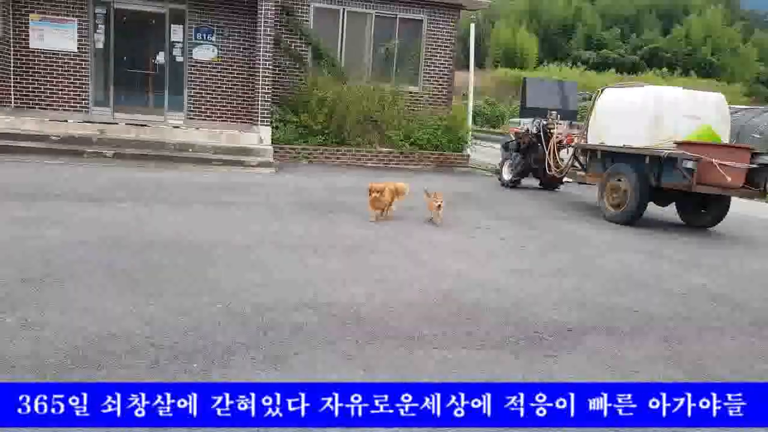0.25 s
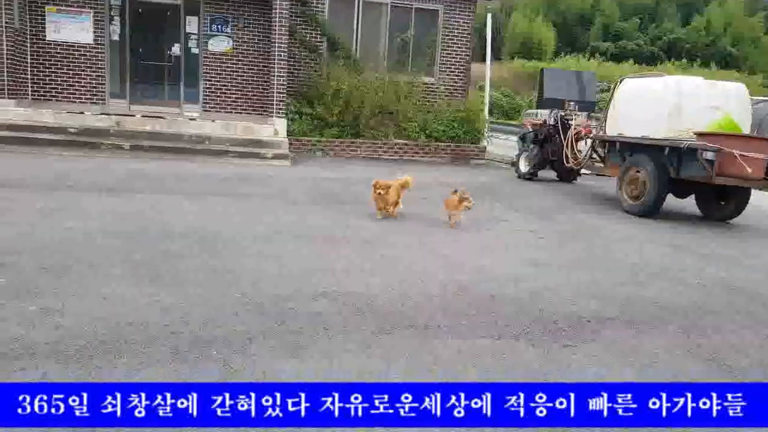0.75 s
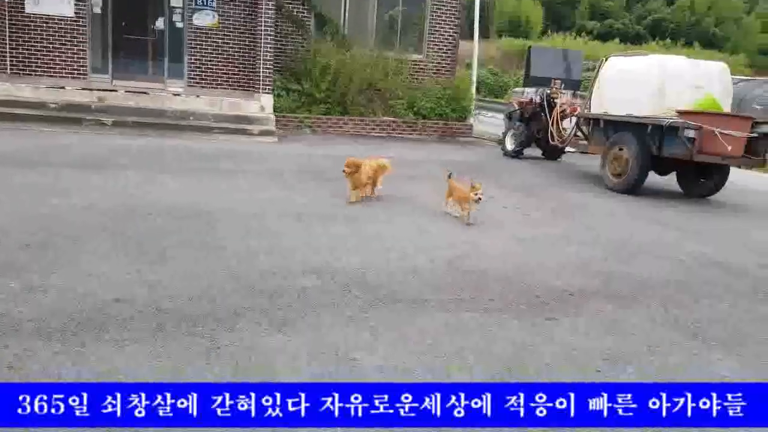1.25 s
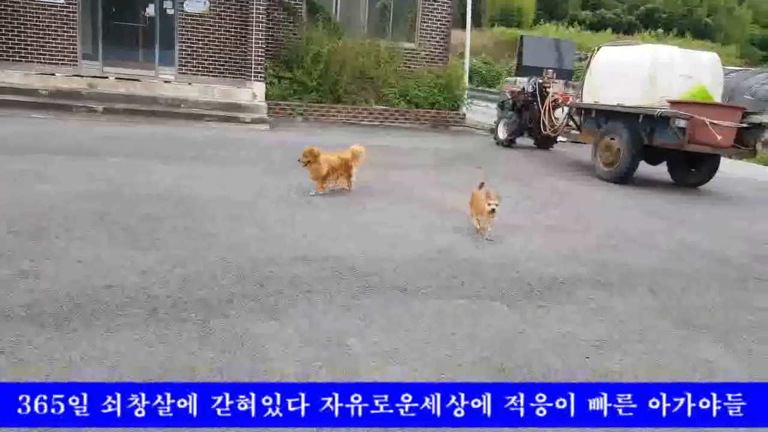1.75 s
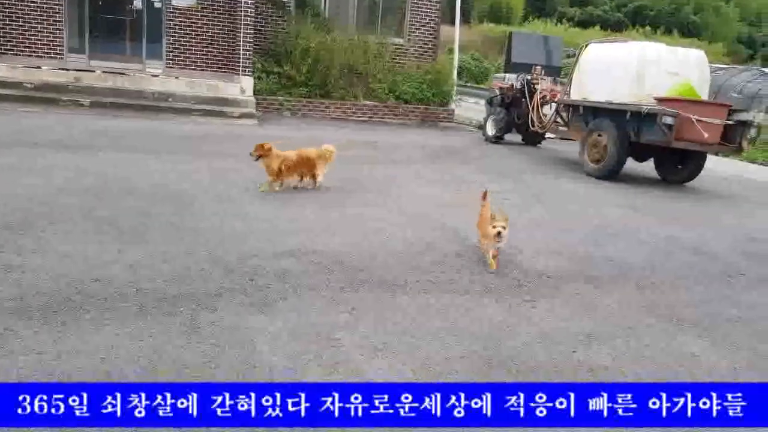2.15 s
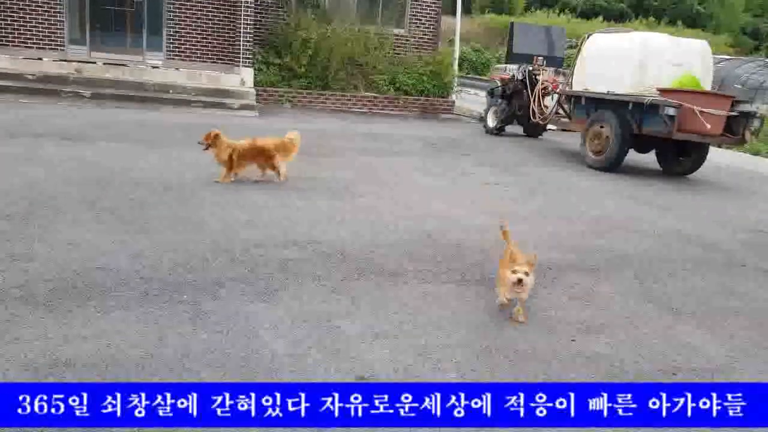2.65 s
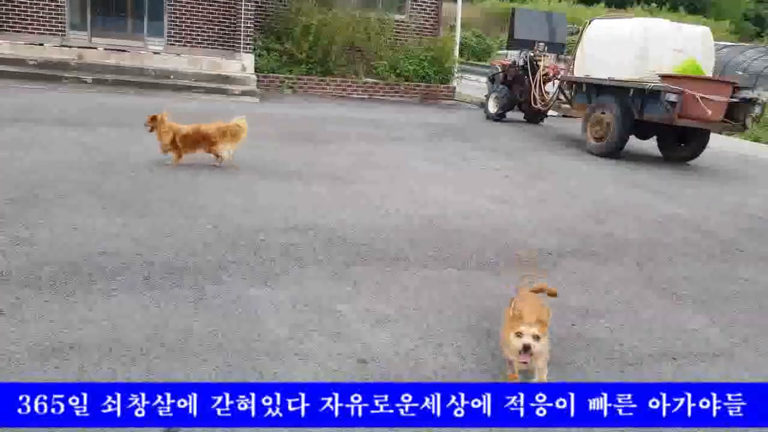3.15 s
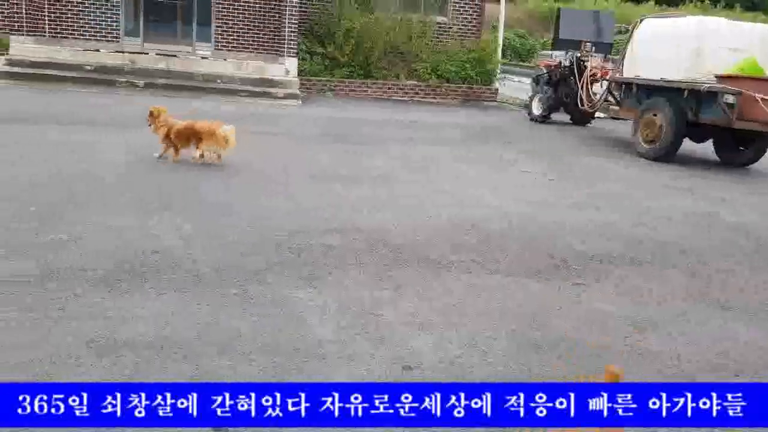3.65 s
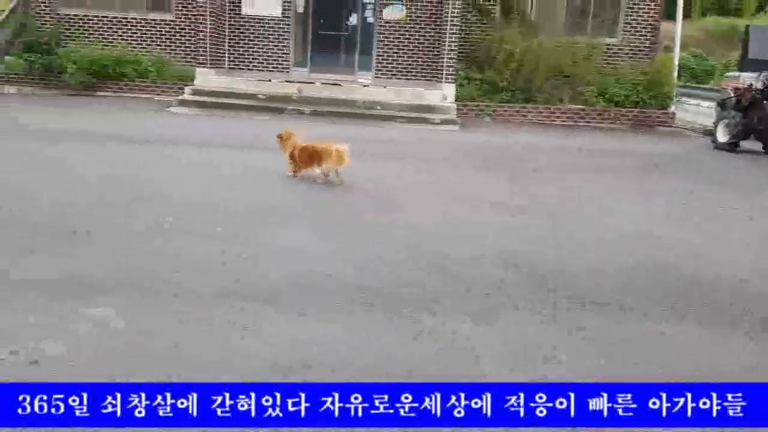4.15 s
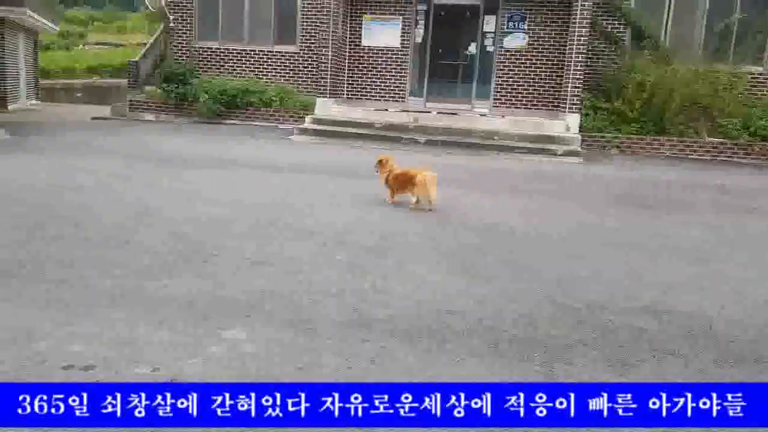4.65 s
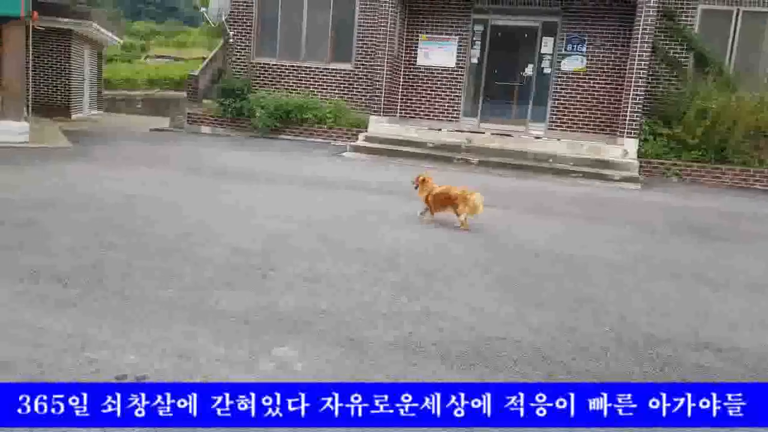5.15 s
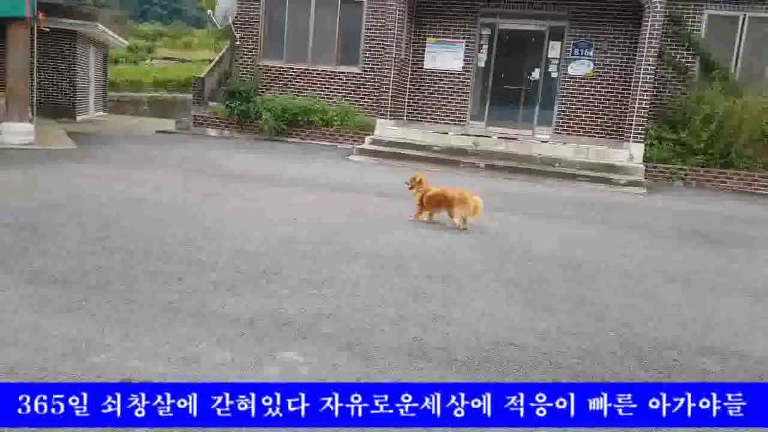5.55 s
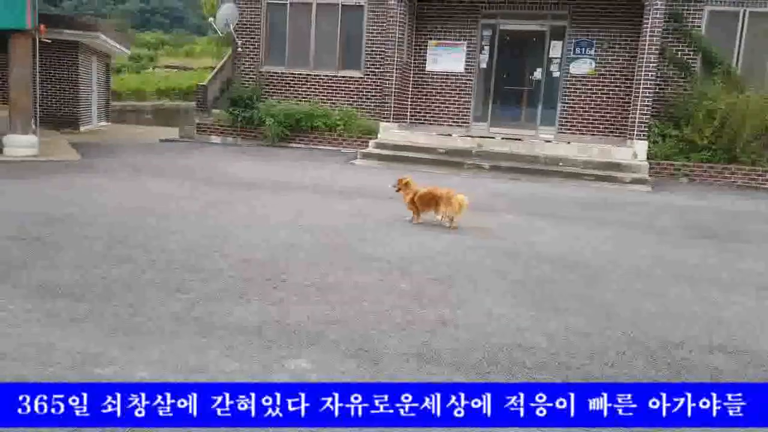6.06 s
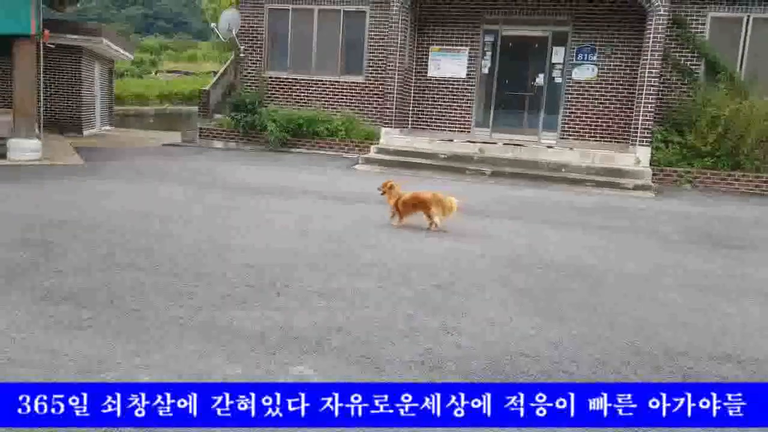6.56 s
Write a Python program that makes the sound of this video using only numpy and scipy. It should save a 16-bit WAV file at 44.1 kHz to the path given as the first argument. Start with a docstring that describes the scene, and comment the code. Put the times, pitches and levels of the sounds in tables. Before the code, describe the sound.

Open farmyard in late summer, stereo and distant. Field crickets chirr steadily, mostly to the left, over low traffic rumble and faint motor hum. A far bird chips about once a second. From under two seconds a small dog's claws tick on asphalt, growing clearer, then fast breathy pants join and last until about five and a half seconds. A short insect trill comes midway; a low breeze and tiny soft clicks end it.

```python
"""A small dog: its claws tick as decaying noise bursts, its pants are puffs of resonant noise, then soft clicks.
Around it lies a quiet farmyard in late summer. Field crickets are short gliding tones, singly and massed;
a trill is a beaten tone; bush crickets are pulsed noise; far insects are fluttering bands of noise.
Birds chip and whistle in gliding tones and call hoarsely in noise.
Beneath lie a low rumble of filtered noise, a breeze and a far motor's hum of wavering tones."""
import sys
import numpy as np
from scipy import signal
from scipy.fft import rfft, irfft
from scipy.io import wavfile
from scipy.ndimage import uniform_filter1d

SR = 44100
rng = np.random.default_rng(int(sys.argv[2]) if len(sys.argv) > 2 else 0)


def inscribe(sig):
    """Save sig as 16-bit PCM at rate SR to the path in sys.argv[1].

    A 1-D sig is mono; a 2-D sig holds one channel per row.
    Samples are clipped to [-1, 1] before scaling.
    """
    pcm = np.round(np.clip(np.atleast_2d(sig).T, -1, 1) * 32767)
    wavfile.write(sys.argv[1], SR, pcm.astype(np.int16))


N = 300762
T = np.arange(N) / SR  # time of each sample, s
HZ = np.fft.rfftfreq(N, 1 / SR)  # frequency of each spectral line, Hz
EDGE_HZ = 15780  # upper limit of the whole sound

# Spectra are relative levels per Hz; their overall level is set elsewhere.
# spectrum of the low rumble: [f/Hz, level/dB]
RUMBLE_SPECTRUM = [(12, -20), (25, -19), (35, -10), (46, 0.4), (70, 0.6), (105, -1), (145, -8.5),
                   (240, -10.5), (330, -16), (480, -20.5), (640, -21.5), (745, -29), (920, -40),
                   (1400, -60)]
# course of the rumble before a fixed gain: [t/s, level/dB]
RUMBLE_COURSE = [(0, -54), (.7, -56.5), (1.8, -54.5), (2.25, -54.5), (2.7, -55.5), (4.2, -54), (5.2, -55),
                 (6.82, -54)]
# likeness of the rumble at the two ears: [f/Hz, likeness 0-1]
RUMBLE_LIKENESS = [(50, 0.94), (150, 0.98), (350, 0.81), (700, 0.32), (1200, 0.12)]
# a breath of wind: [t/s, level/dB]
BREEZE_COURSE = [(0, -59.5), (5.9, -69), (6.15, -53), (6.35, -56), (6.55, -48), (6.82, -58)]
# tones of the far motor: [f/Hz, level/dB, rms waver/Hz]
MOTOR_TONES = [(59.77, -52.5, 0.75), (165.5, -69, 2.12), (362, -70.5, 1.986), (372, -75.5, 0.83),
               (456.4, -79, 3.3), (621.5, -80, 7), (675, -87, 1.43)]

# spectrum of the faint hiss: [f/Hz, level/dB]
HISS_SPECTRUM = [(300, -3), (900, 2), (1350, 2.5), (1750, -0.3), (3100, 1.5), (5200, -1), (7200, 4.5),
                 (9700, -5), (14000, 3.5), (15800, -3)]
PATCH_DB = 1.4  # rms depth of the patches in the far insects and hiss
# noise bands: a faint band near 2.2 kHz that leans left, then far insect choruses: [centre f/Hz, width/Hz,
# level/dB, left-right difference/dB, rms flutter/dB]
NOISE_BANDS = [(2230, 600, -79.5, 8.5, 0.6), (4800, 1070, -75.5, -6, 3), (6030, 1340, -72, 1, 1.9),
               (8010, 780, -71, 6.5, -0.2), (8500, 950, -69, 1.5, 1.5), (12400, 2100, -73, -2, 1.5)]

# spectrum of the mass of field crickets: [f/Hz, level/dB]
CRICKET_SPECTRUM = [(3100, -38), (3450, -3), (3750, 4), (4100, 3), (4500, 4.5), (4680, -2), (4850, -15.5)]
# course shared by the mass and the crowd, before their own gains: [t/s, level/dB]
CRICKET_COURSE = [(0, -65), (.5, -62.5), (1.0, -65), (1.9, -61.5), (2.6, -65), (3.7, -64), (4.4, -68),
                  (5.1, -65), (6.15, -67.5), (6.82, -62.5)]
# runs of near wing strokes: [first t/s, strokes, rate/(strokes per s), f/Hz, level of last stroke/dB]
NEAR_RUNS = [(0.0, 3, 14.7, 4100, -57.5), (0.246, 6, 24.5, 4080, -62), (0.563, 2, 23, 4060, -64),
             (.713, 3, 9, 4120, -61), (.77, 3, 8.6, 4070, -64), (1.036, 5, 14, 3630, -64),
             (1.02, 4, 15.5, 3950, -63.5), (1.437, 5, 16, 3630, -64.5), (1.486, 6, 15, 4080, -60.5),
             (1.92, 5, 19.3, 4040, -60), (2.228, 2, 23, 4090, -63), (2.383, 4, 8.6, 4040, -63),
             (2.855, 6, 17, 4010, -63.5), (3.371, 4, 14.8, 4110, -60.5), (3.698, 3, 16.5, 4050, -61.5),
             (3.862, 4, 18.5, 4110, -66), (4.179, 3, 8.3, 4150, -64), (5.107, 4, 13.7, 4090, -67),
             (5.404, 3, 15, 4060, -70), (6.729, 2, 15, 4080, -66)]
SWELL_DB_PER_STROKE = 1.1
# the crowd: number of runs, gain on the shared course, pace, lowest pitch and pitch range
CROWD_COUNT, CROWD_DB = 55, -5
CROWD_PER_S, CROWD_LOW_HZ, CROWD_RANGE_HZ = 14.7, 3820, 676

# the trill: onset, attack, hold from onset, level before the beats, and fade after the hold
TRILL_START_S, TRILL_ATTACK_S, TRILL_HOLD_S = 4.39, 0.075, 0.31
TRILL_DB, TRILL_FADE_DB_PER_S = -62.5, 17
# its first pitch, sag, rms jitter of pitch, and scattered level
TRILL_HZ, TRILL_SAG_HZ_PER_S2 = 4675, 205
TRILL_JITTER_HZ, TRILL_WET_DB = 20, -8
# its wing beats: pace, first depth, and time constant of the blurring
TRILL_BEATS_PER_S, TRILL_BEAT_DEPTH, TRILL_BLUR_S = 54, 0.97, 0.47

# rasps of a bush cricket: [start t/s, length/s, level/dB]
RASP_EVENTS = [(0.163, 0.4, -60), (1.96, 0.37, -60.5), (3.66, 0.38, -62.5), (5.39, 0.39, -64)]
# spectrum of the file's hiss: [f/Hz, level/dB]
RASP_SPECTRUM = [(7000, -15), (8200, 5), (10000, 4), (11400, -3), (12400, 8), (13000, 2), (14200, 6.5),
                 (14800, 3), (16000, 1)]
RASP_ROUNDING = .7  # exponent on the swell; less is fuller
# the wing's ringing: first and last pitch, climb time, width
RASP_FIRST_HZ, RASP_LAST_HZ, RASP_CLIMB_S, RASP_WIDTH_HZ = 7900, 10500, 0.17, 1100
RASP_RING_DB, RASP_HISS_DB = -3.5, -0.5
# the file's teeth: mean rate of clicks, and the share of the rasp they carry
RASP_TEETH_PER_S, RASP_BUZZ = 112, .7
# the very high singer: period, time of one crest, level at t = 0, growth
WHISPER_PERIOD_S, WHISPER_AT_S = .2535, 4.565
WHISPER_DB, WHISPER_DB_PER_S = -69, 0.76
# its bands: [centre f/Hz, width/Hz, relative level/dB]
WHISPER_PARTS = [(12500, 3000, 0), (12900, 420, -2)]
# a far insect's shimmer: [t/s, level/dB]
SHIMMER_COURSE = [(0, -76), (.6, -76), (.9, -72), (3.2, -72), (3.7, -78), (6.82, -91)]

# chips of a far bird, before the gain of each note: [t/s, level/dB]
CHIP_EVENTS = [(.155, -53.5), (1.075, -56), (1.935, -55.5), (2.735, -56.5), (3.712, -54.5), (4.735, -57.5),
               (5.735, -56.5)]
# the two rising notes of a chip: [delay/s, middle f/Hz, rise/Hz, length/s, relative level/dB]
CHIP_PAIR = [(0, 6000, 1495, 0.055, -8.5), (0.062, 4955, 1103, 0.055, -6.5)]
CHIP_ROUGH_HZ, CHIP_BREAKUP_DB = 560, 5  # rms scatter of pitch; bound of the uneven level
# thin whistles: [start t/s, length/s, first f/Hz, middle f/Hz, last f/Hz, level/dB]
WHISTLE_EVENTS = [(3.252, 0.12, 2106, 2120, 2380, -76), (4.804, 0.14, 3390, 3810, 3170, -66.5),
                  (6.332, 0.12, 3510, 3630, 3650, -71), (6.482, .085, 3520, 3560, 3690, -70)]
WHISTLE_GROWTH_DB = 1  # rise over one whistle
# hoarse calls: [middle t/s, length/s, f/Hz, width/Hz, level/dB]
CAW_EVENTS = [(0.465, 0.07, 3300, 900, -69.5), (2.103, 0.19, 2850, 900, -68),
              (5.335, 0.48, 1290, 300, -77.5)]
CAW_FLUTTER_DB = 1.8

# soft clicks, perhaps the dog licking its lips: [t/s, f/Hz, level/dB]
SMACK_EVENTS = [(6.584, 1660, -61), (6.6, 2200, -61), (6.633, 2200, -68), (6.657, 2200, -66.5)]
SMACK_WIDTH_HZ, SMACK_DECAY_S = 1500, 0.0055
# claws ticking on asphalt: [t/s, level/dB]
CLAW_TICKS = [(1.6996, -54), (1.85, -55), (1.9928, -50), (2.1395, -54), (2.142, -54), (2.4216, -53),
              (2.4274, -48), (2.431, -51), (2.5749, -46), (2.5846, -54), (2.5943, -52), (2.5971, -51),
              (2.719, -50), (2.7218, -45), (2.8696, -52), (2.8756, -51), (2.8786, -52), (3.0247, -51),
              (3.0275, -46), (3.188, -51), (3.1936, -48), (3.3532, -44.5), (3.357, -46), (3.5298, -48.5),
              (3.5358, -49), (3.7035, -55), (4.0859, -51), (4.0909, -52), (4.1226, -43), (4.3118, -53)]
# paws scuffing the grit: [t/s, level/dB]
PAW_SCUFFS = [(1.85, -61), (1.993, -57), (2.429, -62), (2.578, -62), (2.599, -61), (2.724, -57),
              (2.876, -58), (3.027, -60), (3.191, -56), (3.356, -60), (3.532, -60), (3.707, -58),
              (4.087, -56.5), (4.311, -62)]
# spectrum of ticks and scuffs: [f/Hz, level/dB]
CLAW_SPECTRUM = [(2000, -19), (6000, -10), (8000, -0.5), (9500, 1), (11000, 0), (13000, -1), (16000, -12)]
TICK_DECAY_S, SCUFF_S = 0.0013, 0.015
# pants: [middle t/s, length/s, mouth level/dB, mouth f/Hz, open throat level/dB, low throat level/dB]
PANT_EVENTS = [(2.622, 0.036, -67, 2200, -77, -87), (2.798, 0.06, -67, 1860, -65, -88),
               (3.194, 0.074, -75, 1300, -66, -85), (3.366, 0.059, -66, 2360, -65.5, -78),
               (3.542, 0.066, -66.5, 2260, -63.5, -69), (3.717, 0.071, -69.5, 2040, -68.5, -65),
               (3.899, 0.067, -81, 2350, -64, -61.5), (4.104, 0.059, -68.5, 2140, -59.5, -54.5),
               (4.311, 0.079, -69, 2120, -62.5, -63), (4.52, 0.087, -68.5, 2220, -65.5, -62.5),
               (4.72, 0.077, -75, 2200, -68, -63.5), (4.911, 0.08, -66.5, 2380, -59.5, -62),
               (5.111, 0.063, -73, 1780, -67.5, -63), (5.302, 0.12, -70, 2350, -65, -71),
               (5.5, .06, -71, 2770, -71, -69)]
# resonances of the open throat: [f/Hz, width/Hz, relative level/dB]
THROAT_RESONANCES = [(1040, 130, -3), (1590, 240, -6.5), (2740, 710, -11), (3970, 1140, -4)]
LOW_THROAT_HZ, LOW_THROAT_WIDTH_HZ = 749, 148
MOUTH_WIDTH_HZ = 390


def amp(db):
    """Logarithmic level: decibels become an amplitude ratio."""
    return 10 ** (np.asarray(db) / 20)


def evened(x):
    """Normalisation: the signal is scaled to an rms of one."""
    return x / np.sqrt(np.mean(x ** 2) + 1e-20)


def read(points):
    """Interpolation on logarithmic frequency: a few points become a full spectrum."""
    f, value = np.transpose(points)
    return np.interp(np.log(HZ + 1), np.log(f), value)


def curve(rows):
    """Linear interpolation in time: a few points become a value at every sample."""
    return np.interp(T, *np.transpose(rows))


def band(hz, width):
    """Gaussian band-pass: the response falls smoothly on both sides of its centre."""
    return np.exp(-2 * ((HZ - hz) / width) ** 2)


def drift(rate):
    """Low-passed chance: white noise below about the given rate makes a slow walk of unit rms."""
    return evened(irfft(rfft(rng.standard_normal(N)) * np.exp(-(HZ / rate) ** 2), N))


def pan(db):
    """Interaural level difference: positive values favour the left channel."""
    return amp([[db / 2], [-db / 2]])


def noise(shape, same=0):
    """Partial coherence: two filtered noises share a given part of their spectrum."""
    a, b = rfft(rng.standard_normal((2, N)))
    same = np.clip(same, -1, 1)
    right = same * a + np.sqrt(1 - same ** 2) * b
    return evened(irfft(np.array([a, right]) * shape, N))


def swell(middle, length):
    """Half-cosine envelope: a smooth rise and fall about its middle."""
    return np.cos(np.pi * np.clip((T - middle) / length, -.5, .5))


def yard(x, wet_db, t60):
    """Reverberation: sparse decaying echoes of walls and ground, independent at each ear."""
    t = np.arange(SR // 2) / SR
    echoes = rng.standard_normal((2, len(t))) * (rng.random((2, len(t))) < .05)
    taps = echoes * amp(-60 * t / t60)
    taps *= amp(wet_db) / np.linalg.norm(taps, axis=1, keepdims=True)
    taps[:, 0] += 1  # direct sound
    wet = signal.fftconvolve(np.atleast_2d(x), taps, axes=1)[:, :N]
    return wet / np.sqrt(1 + amp(wet_db) ** 2)


def rumble():
    """Low-frequency coherence: far traffic is alike at both ears at the bottom; a light breeze joins it."""
    tilt = read([(60, 0.71), (300, 1.8), (450, 3.3), (650, 4.3)])  # left-right difference, dB
    side = amp(np.array([[.5], [-.5]]) * tilt)
    traffic = noise(amp(read(RUMBLE_SPECTRUM)) * side, read(RUMBLE_LIKENESS))
    traffic = traffic * amp(curve(RUMBLE_COURSE) + 3)
    breeze = noise(band(60.6, 29), same=0.98) * amp(curve(BREEZE_COURSE)) * pan(0.73)
    return traffic + breeze


def motor():
    """Additive synthesis: a deep hum and weak overtones waver in level and frequency."""
    tones = 0
    for hz, db, waver in MOTOR_TONES:
        level = amp(db + 1.66 * drift(3.8))
        turns = np.cumsum(hz + waver * drift(5.3)) / SR
        tones = tones + level * np.sin(2 * np.pi * turns)
    return np.sqrt(2) * tones * pan(1.5)


def patchy(x, depth_db):
    """Time-frequency modulation: patches of the spectrum swell and sink by chance."""
    z = signal.stft(x, nperseg=512)[2]
    field = uniform_filter1d(rng.standard_normal(z.shape[1:]), size=6, axis=0)  # along frequency
    field = uniform_filter1d(field, size=18, axis=1)  # along time
    return signal.istft(z * amp(depth_db * evened(field)), nperseg=512)[1][:, :N]


def far_insects():
    """Incoherent summation: countless far singers melt into fluttering noise bands over a hiss, joined by a
    faint left-leaning band near 2.2 kHz."""
    bands = 0
    for hz, width, db, side_db, flutter in NOISE_BANDS:
        bands = bands + noise(band(hz, width)) * amp(db + flutter * drift(7.2)) * pan(side_db)
    tilt = read([(1000, 0.0), (2800, 7.0), (6000, 2.5), (10000, 0.0)])  # left-right difference, dB
    side = amp(np.array([[.5], [-.5]]) * tilt)
    hiss = noise(amp(read(HISS_SPECTRUM)) * side) * amp(-65.5)
    return patchy(bands + hiss, depth_db=PATCH_DB)


def stroke(s, hz, glide_hz, length, rough_hz=0):
    """Frequency modulation: a short tone glides through its middle pitch, with optional jitter."""
    near = slice(max(round((s - length / 2) * SR), 0), max(round((s + length / 2) * SR), 1))
    t, out = T[near] - s, np.zeros(N)
    jitter = evened(uniform_filter1d(rng.standard_normal(4096), size=24))[:len(t)]
    turns = np.cumsum(hz + glide_hz * t / length + rough_hz * jitter) / SR
    out[near] = np.sqrt(2) * np.cos(np.pi * t / length) * np.sin(2 * np.pi * turns)
    return out


def cricket_run(s, count, rate, hz, db):
    """Stridulation: evenly spaced wing strokes swell to the last; each sinks as the wings slow."""
    last = max(round(count), 1) - 1
    out = 0
    for k in range(last + 1):
        pitch = hz + 20 * rng.standard_normal()
        tone = stroke(s + k / rate, hz=pitch, glide_hz=-320, length=0.03, rough_hz=30.0)
        out = out + amp(db - SWELL_DB_PER_STROKE * (last - k)) * tone
    return out


def field_crickets():
    """Superposition: near crickets stand out of a random crowd and a throbbing far mass of noise."""
    near = yard(sum(cricket_run(*run) for run in NEAR_RUNS), wet_db=-11, t60=.2)
    crowd = 0
    for when, high in rng.random((CROWD_COUNT, 2)):
        hz = CROWD_LOW_HZ + CROWD_RANGE_HZ * high
        crowd = crowd + cricket_run(when * T[-1], count=5, rate=CROWD_PER_S, hz=hz, db=CROWD_DB)
    crowd = yard(crowd, wet_db=-3, t60=.2) * amp(curve(CRICKET_COURSE))
    throb = amp(curve(CRICKET_COURSE) - 0.5 + 1.26 * drift(25))
    mass = noise(amp(read(CRICKET_SPECTRUM))) * throb
    return (near + crowd) * pan(5.9) + mass * pan(7.5)


def trill():
    """Amplitude modulation: fast wing beats blur while the tone sags in pitch, then fades."""
    age = np.maximum(T - TRILL_START_S, 0)
    fade_db = TRILL_FADE_DB_PER_S * np.maximum(age - TRILL_HOLD_S, 0)
    level = np.minimum(age / TRILL_ATTACK_S, 1) * amp(TRILL_DB - fade_db)
    beat_turns = np.cumsum(TRILL_BEATS_PER_S + 1.3 * drift(7.3)) / SR
    depth = TRILL_BEAT_DEPTH * np.exp(-age / TRILL_BLUR_S)
    beats = 1 + depth * np.cos(2 * np.pi * beat_turns)
    hz = TRILL_HZ - TRILL_SAG_HZ_PER_S2 * age ** 2 + TRILL_JITTER_HZ * drift(99)
    tone = np.sin(2 * np.pi * np.cumsum(hz) / SR)
    return yard(tone * beats * level, wet_db=TRILL_WET_DB, t60=0.38) * pan(3.7)


def resonate(x, hz, width):
    """Heterodyne resonance: a double pole at zero frequency is shifted to follow the curve hz."""
    turn = np.exp(2j * np.pi * np.cumsum(hz) / SR)
    r = np.exp(-np.pi * width / SR)
    return evened((turn * signal.lfilter([1], np.poly([r, r]), x / turn)).real)


def rasps():
    """Forced resonance: a file's teeth buzz against a wing whose ringing climbs as the stroke speeds up."""
    level, age = 0, 0
    for s, length, db in RASP_EVENTS:
        level = level + amp(db) * swell(s + length / 2, length) ** RASP_ROUNDING
        age = age + (T - s) * ((T >= s) & (T < s + length))
    climb = np.sin(np.pi / 2 * np.minimum(age / RASP_CLIMB_S, 1)) ** 2
    hz = RASP_FIRST_HZ + (RASP_LAST_HZ - RASP_FIRST_HZ) * climb
    tooth = np.cumsum(RASP_TEETH_PER_S + 8 * drift(20)) / SR % 1  # phase between teeth
    teeth = evened(1 - RASP_BUZZ + RASP_BUZZ * np.exp(-tooth / .25))
    ring = resonate(noise(1) * teeth, hz, RASP_WIDTH_HZ) * amp(RASP_RING_DB)
    hiss = noise(amp(read(RASP_SPECTRUM))) * np.sqrt(teeth) * amp(RASP_HISS_DB)
    return (ring + hiss) * level * pan(.3)


def whisper():
    """Periodic modulation: very high noise swells at a steady pace and slowly grows."""
    swells = (.5 + .5 * np.cos(2 * np.pi * (T - WHISPER_AT_S) / WHISPER_PERIOD_S)) ** 1.5
    shape = sum(amp(db) * band(hz, width) for hz, width, db in WHISPER_PARTS)
    return noise(shape) * swells * amp(WHISPER_DB + WHISPER_DB_PER_S * T)


def shimmer():
    """Random modulation: the level of one noise band flickers by chance."""
    return noise(band(6380, 1000)) * amp(curve(SHIMMER_COURSE) + 3.0 * drift(30)) * pan(9.3)


def bush_crickets():
    """Superposition of three singers: one rasps, one whispers very high, one shimmers."""
    return rasps() + whisper() + shimmer()


def bird_chips():
    """Frequency glides: pairs of rough rising notes break up in level."""
    chips = 0
    for s, db in CHIP_EVENTS:
        for delay, hz, rise, length, note_db in CHIP_PAIR:
            pitch = hz * rng.uniform(.98, 1.02)
            note = stroke(s + delay, pitch, rise, length, rough_hz=CHIP_ROUGH_HZ)
            chips = chips + amp(db + note_db) * note
    breakup = evened(amp(CHIP_BREAKUP_DB * np.tanh(drift(130))))
    return yard(chips, wet_db=2, t60=.14) * breakup


def bird_whistles():
    """Near-sinusoidal tones: each pitch follows a parabola with jitter and grows towards its end."""
    whistles = np.zeros(N)
    for s, length, first, middle, last, db in WHISTLE_EVENTS:
        path = np.polyfit([0, .5, 1], [first, middle, last], 2)
        hz = np.polyval(path, np.clip((T - s) / length, 0, 1))
        growth = amp(WHISTLE_GROWTH_DB * np.clip((T - s) / length - .5, -.5, .5))
        level = np.sqrt(2) * amp(db) * swell(s + length / 2, length) ** .3 * growth
        whistles += level * np.sin(2 * np.pi * np.cumsum(hz + 38 * drift(140)) / SR)
    return yard(whistles * amp(2.5 * drift(70) - 1), wet_db=-12, t60=.2)


def bird_caws():
    """Band-limited noise: hoarse calls swell, fall and flutter."""
    caws = 0
    for s, length, hz, width, db in CAW_EVENTS:
        caws = caws + noise(band(hz, width)) * amp(db) * swell(s, length)
    return caws * amp(CAW_FLUTTER_DB * drift(60))


def birds():
    """Superposition in one direction: chips, hoarse calls and whistles lie to the left."""
    return (bird_chips() + bird_caws() + bird_whistles()) * pan(11.6)


def smacks():
    """Impulsive excitation: small, dull bursts of noise start abruptly and die at once."""
    clicks = 0
    for s, hz, db in SMACK_EVENTS:
        decay = (T >= s) * np.exp(-abs(T - s) / SMACK_DECAY_S)
        clicks = clicks + noise(band(hz, SMACK_WIDTH_HZ), same=0.47) * amp(db) * decay
    return clicks * pan(5)


def claws():
    """Impact and friction: claws tick as abrupt noise on asphalt, and paws scuff as sparse grains of grit."""
    ticks = sum(amp(db) * (T >= s) * np.exp(-abs(T - s) / TICK_DECAY_S) for s, db in CLAW_TICKS)
    scuffs = sum(amp(db) * np.exp(-abs(T - s) / SCUFF_S) for s, db in PAW_SCUFFS)
    grit = evened(rng.standard_normal((2, N)) * (rng.random(N) < .05))
    contact = noise(1, same=0.36) * ticks + grit * scuffs
    colour = evened(amp(read(CLAW_SPECTRUM)))
    return irfft(rfft(contact) * colour, N) * pan(0.45)


def panting():
    """Source and filter: puffs of turbulent air excite a changing mouth, an open throat and a low throat."""
    low_throat = noise(band(LOW_THROAT_HZ, LOW_THROAT_WIDTH_HZ), same=0.48) * pan(3.8)
    shape = sum(amp(db) / (1 + (2 * (HZ - hz) / width) ** 2) for hz, width, db in THROAT_RESONANCES)
    open_throat = noise(shape, same=0.2) * pan(5.4)
    out = np.zeros((2, N))
    for s, length, mouth_db, mouth_hz, throat_db, low_db in PANT_EVENTS:
        mouth = noise(band(mouth_hz, MOUTH_WIDTH_HZ), same=0.23) * pan(8.4)
        puff = amp(low_db) * low_throat + amp(mouth_db) * mouth + amp(throat_db) * open_throat
        out += swell(s, length) ** 1.33 * puff
    return yard(out, wet_db=-6.5, t60=0.76)


def scene():
    """Linear superposition: the pressures of all sources in the yard add."""
    background = rumble() + motor() + far_insects()
    singers = field_crickets() + trill() + bush_crickets() + birds()
    dog = smacks() + claws() + panting()
    return background + singers + dog


def record(dry):
    """Band limitation: a linear-phase low-pass removes what lies above the edge."""
    lowpass = signal.firwin(1023, EDGE_HZ, window=("kaiser", 9), fs=SR)
    return signal.oaconvolve(dry, lowpass[None], "same")


dry = scene()
out = record(dry)
inscribe(out)
```